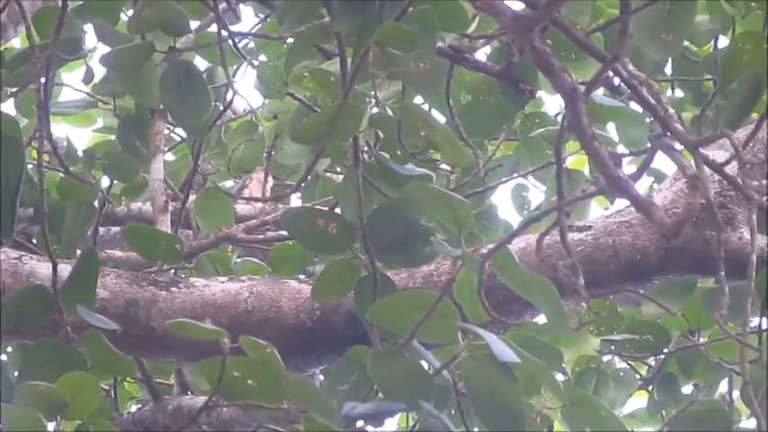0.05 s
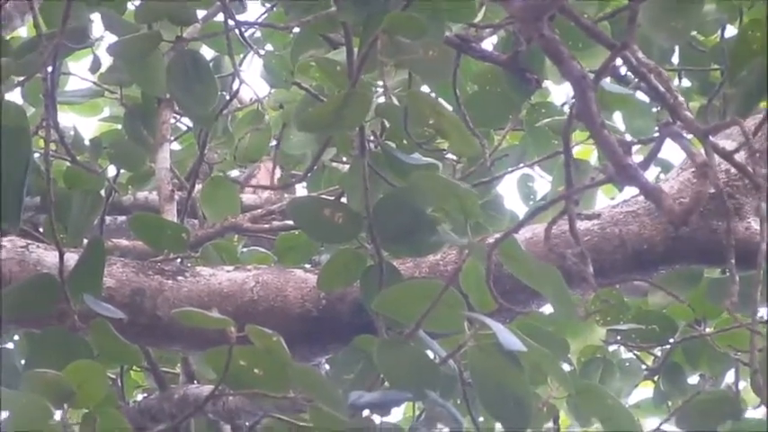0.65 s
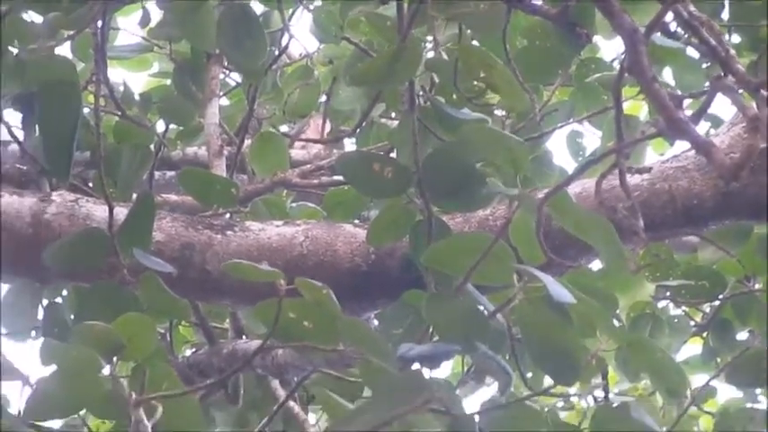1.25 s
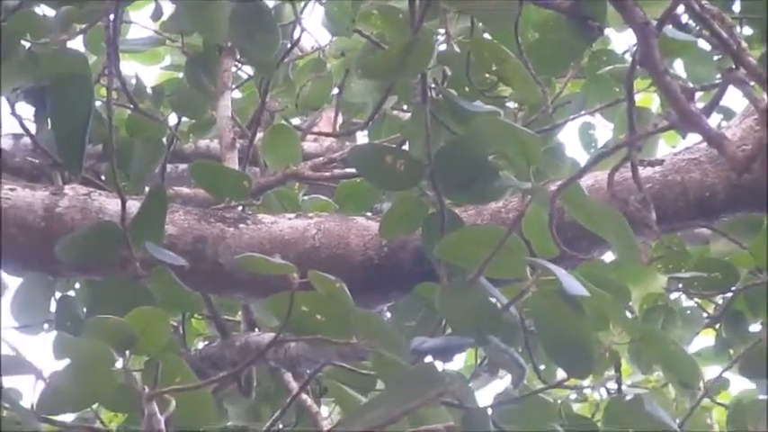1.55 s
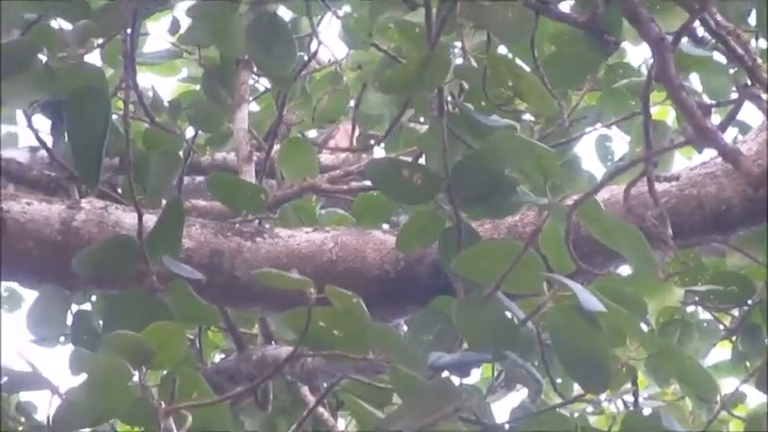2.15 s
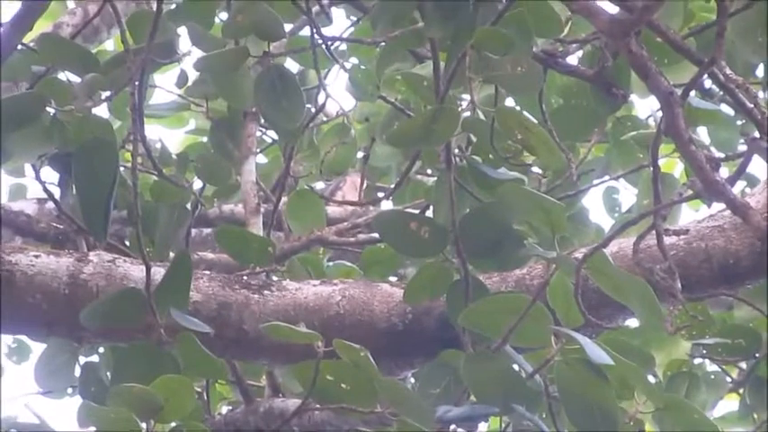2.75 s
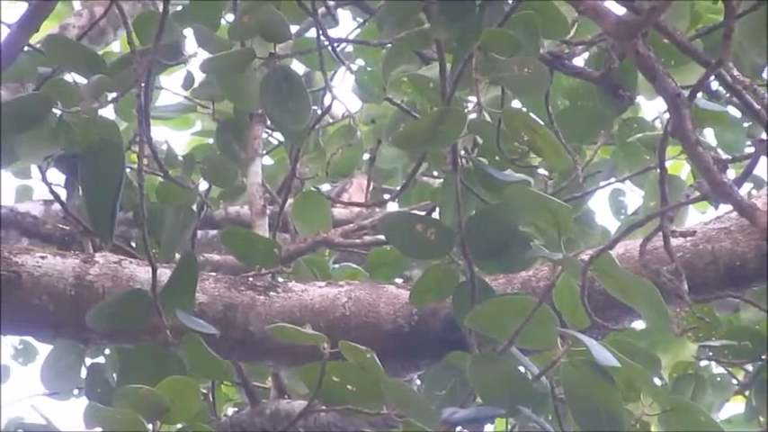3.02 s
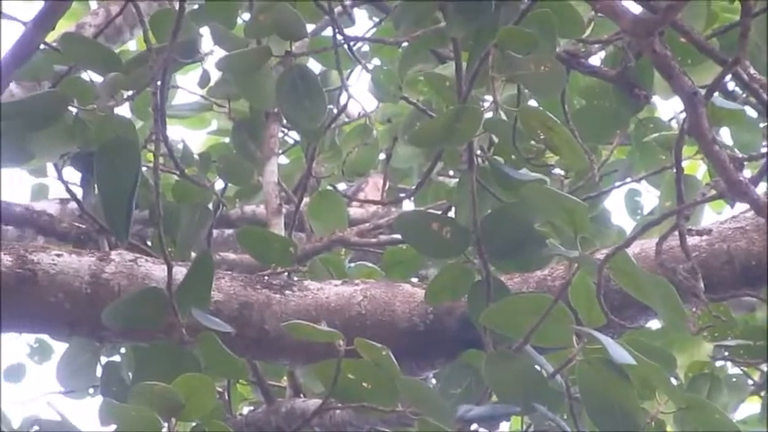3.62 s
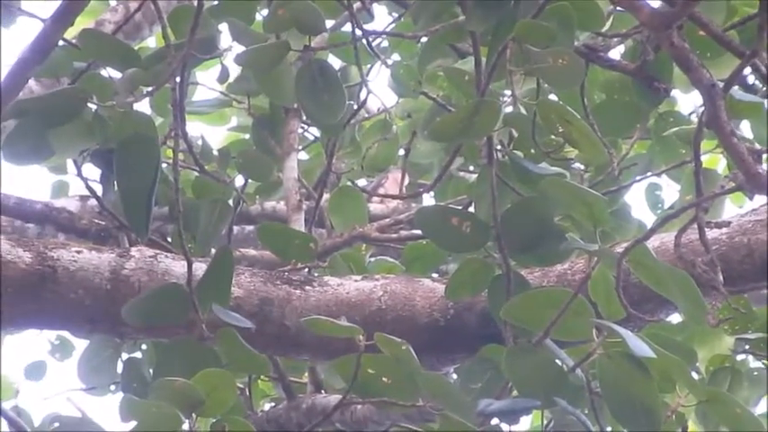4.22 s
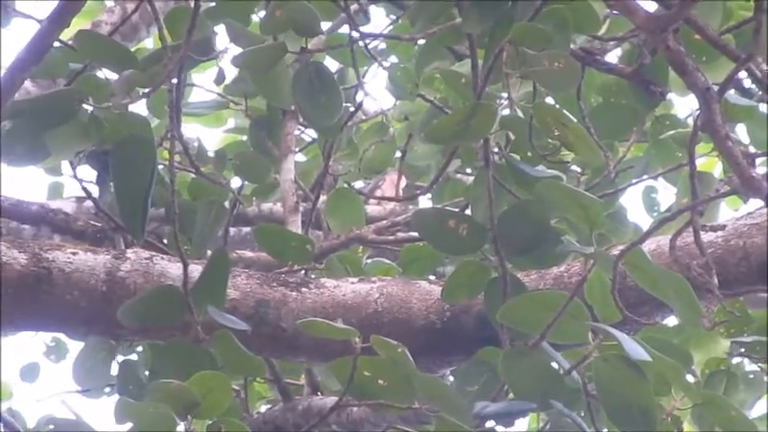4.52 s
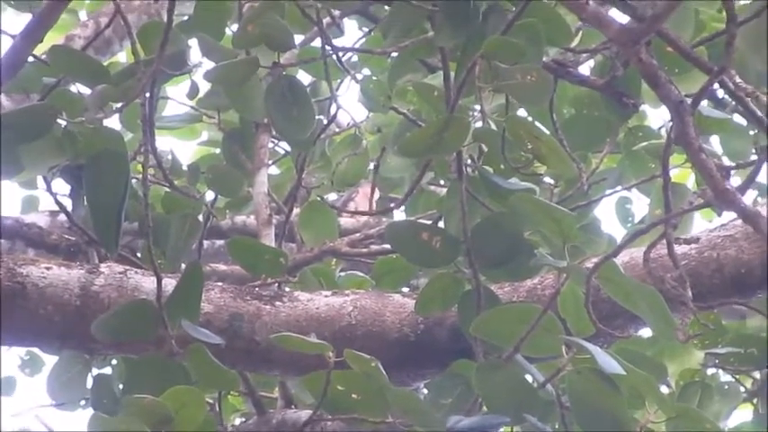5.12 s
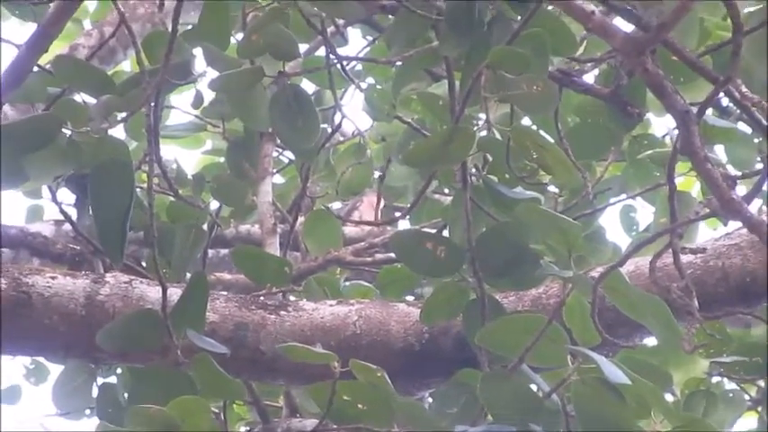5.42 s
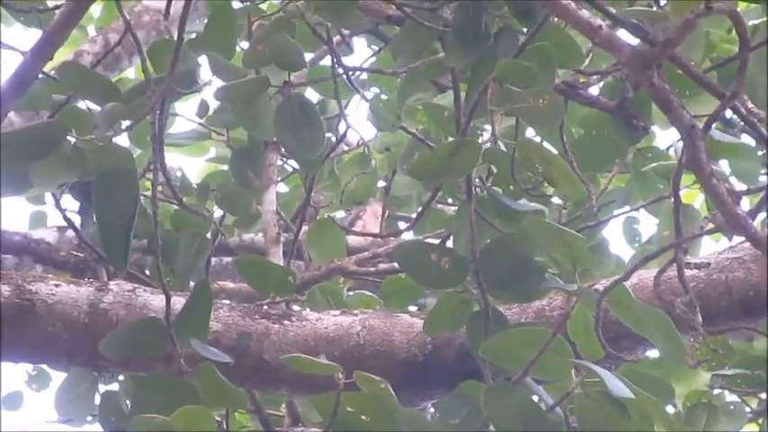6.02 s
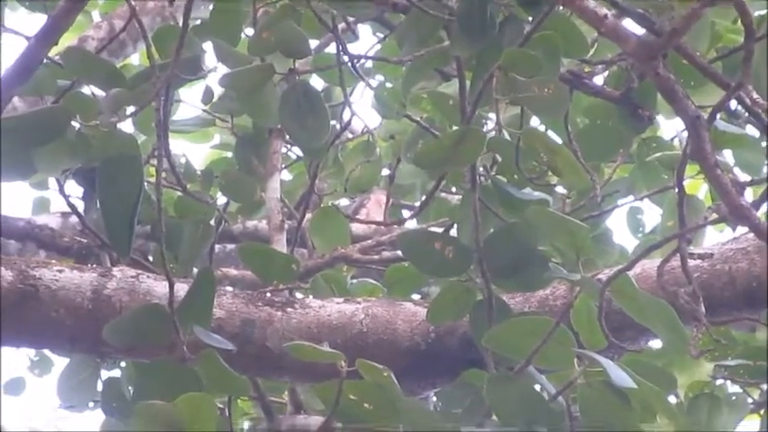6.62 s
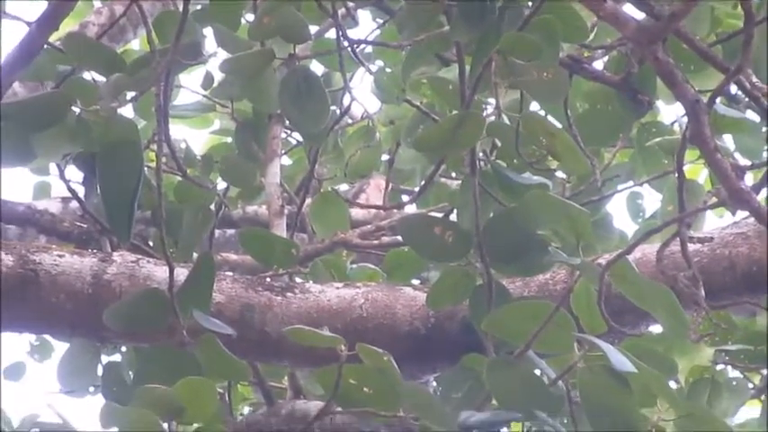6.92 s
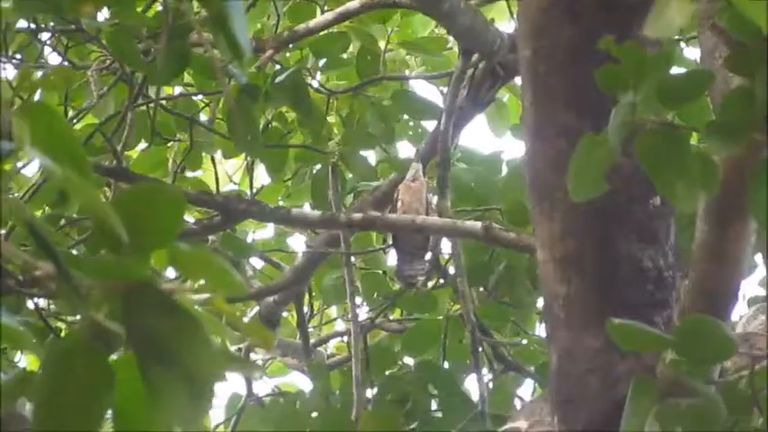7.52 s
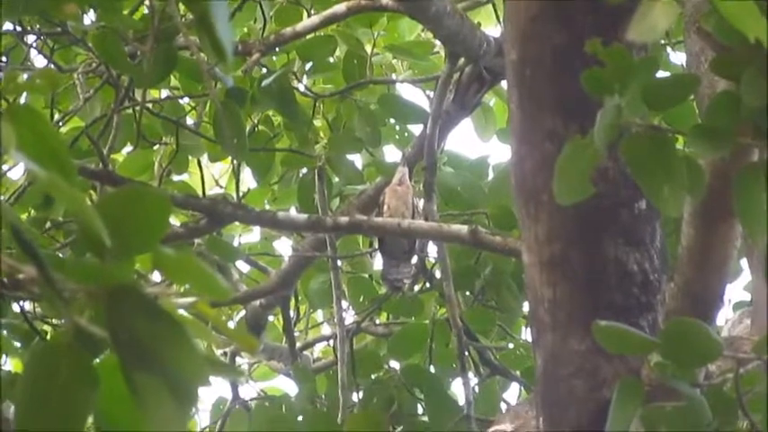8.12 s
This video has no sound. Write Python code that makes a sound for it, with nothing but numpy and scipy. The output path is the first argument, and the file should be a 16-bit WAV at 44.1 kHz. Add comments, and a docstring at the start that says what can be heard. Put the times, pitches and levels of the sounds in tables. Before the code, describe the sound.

A cuckoo whistles three loud echoing notes, small birds chirp over a soft forest hush, and a lower, softer whistled call follows.

```python
"""In a forest, a hawk-cuckoo whistles loud arched notes while small birds drop falling chirps around it.
Trunks and leaves echo every note. Twigs tick and leaves rustle over a soft hush, a far drone and a
faint whirr; everything ducks under the loud call. After a short silent break the hush is thinner
and a lower, softer whistled call follows."""
import sys
import numpy as np
from scipy import signal
from scipy.fft import rfft, irfft
from scipy.io import wavfile
from scipy.ndimage import uniform_filter1d

SR = 44100
rng = np.random.default_rng(int(sys.argv[2]) if len(sys.argv) > 2 else 0)


def inscribe(sig):
    """Save sig as 16-bit PCM at rate SR to the path in sys.argv[1].

    A 1-D sig is mono; a 2-D sig holds one channel per row.
    Samples are clipped to [-1, 1] before scaling.
    """
    pcm = np.round(np.clip(np.atleast_2d(sig).T, -1, 1) * 32767)
    wavfile.write(sys.argv[1], SR, pcm.astype(np.int16))


N = 364266
TIME = np.arange(N) / SR
BREAK_START_S, BREAK_END_S = 6.986, 7.178


def undb(db):
    """Decibels to gain."""
    return 10 ** (np.asarray(db) / 20)


def unit(x):
    """Scale to rms 1."""
    return x / np.sqrt(np.mean(x ** 2))


def pan(db):
    """Stereo gains, left over right by db."""
    return undb([[db / 2], [-db / 2]])


def curves(rows):
    """Interpolate each column over the time in the first."""
    time_s, *columns = np.transpose(rows)
    return [np.interp(TIME, time_s, column) for column in columns]


def wander(rate_hz):
    """Smooth random signal, rms 1."""
    step = max(int(SR / rate_hz), 1)
    held = np.repeat(rng.standard_normal(N // step + 1), step)[:N]
    return unit(uniform_filter1d(held, step))


def band(x, low_hz, high_hz):
    """Band-pass filter."""
    return signal.sosfilt(signal.butter(2, [low_hz, high_hz], "band", fs=SR, output="sos"), x)


def stereo_noise(correlation):
    """White noise, partly shared by both channels."""
    common, side = rng.standard_normal((2, N))
    return unit(np.sqrt(1 + correlation) * common + np.sqrt(1 - correlation) * np.outer([1, -1], side))


def span(start_s, length_s):
    """Sample mask of a note and time since its start."""
    on = (TIME > start_s) & (TIME < start_s + length_s)
    return on, TIME[on] - start_s


def fade(t, length_s, attack_s, release_s):
    """1 at both ends of a note, 0 while held."""
    return np.maximum(1 - t / attack_s, 0) + np.maximum(1 - (length_s - t) / release_s, 0)


def glide(from_hz, to_hz, arch_hz=0):
    """Start, middle and end pitch; the middle lifted by arch_hz."""
    return [from_hz, (from_hz + to_hz) / 2 + arch_hz, to_hz]


def add_note(out, start_s, length_s, pitches_hz, level_db, flutter, peak_at=.5, ease=0):
    """Small bird's note: swells and dies along a three-pitch glide; ease slows the glide's ends."""
    on, t = span(start_s, length_s)
    progress = t / length_s
    eased = progress - ease * np.sin(2 * np.pi * progress) / (2 * np.pi)
    hz = np.polyval(np.polyfit([0, .5, 1], pitches_hz, 2), eased) * flutter[on]
    phase = 2 * np.pi * np.cumsum(hz) / SR
    swell = np.sin(np.pi / 2 * np.interp(progress, [0, peak_at, 1], [0, 1, 0]))
    out[on] += np.sqrt(2) * undb(level_db) * swell * (np.sin(phase) + undb(-47) * np.sin(2 * phase))


# Echoes off near limbs and trunks: delay_s, gain_db
TRUNK_ECHOES = [(.00358, -13), (.00739, -8.5), (.01474, -15), (.04417, -15), (.0785, -15.5),
                (.09365, -19.5)]


def woods(x, wet_db, t60_s, scatter_db, pan_db, lag_samples):
    """Direct sound, twig scatter and trunk echoes, later on the right, plus a diffuse tail."""
    t = TIME[:int(1.5 * SR)]
    scatter = rng.standard_normal(len(t)) * (rng.random(len(t)) < .02)
    scatter *= np.exp(-t / .031) * (t > .006)
    early = undb(scatter_db) * unit(scatter) / np.sqrt(len(t))
    early[0] = 1
    for delay_s, gain_db in TRUNK_ECHOES:
        early[int(round(delay_s * SR))] += undb(gain_db)
    noise = rng.standard_normal((2, len(t)))
    decay = np.exp(-np.log(1000) * t / t60_s)
    treble = 1.53 * band(noise, 3500, 17000) * decay ** 2  # leaves absorb it first
    tail = (band(noise, 200, 4500) * decay + treble) * (1 - np.exp(-t / .024))
    response = np.array([early, np.roll(early, lag_samples)])
    response += undb(wet_db) * unit(tail) * np.sqrt(.22 / len(t))
    return signal.fftconvolve(x[None], response * pan(pan_db), axes=1)[:, :N]


# Drone swell: time_s, gain_db
DRONE_SWELL = [(1.7, -5), (2.2, 10.5), (3.6, 8), (4.3, -5), (6.3, 6.5), (7.2, -7)]


def drone(pitch_hz=88.3, width_hz=8, base_db=-71.5):
    """Far, low, centred drone: a narrow noise band."""
    hum = unit(band(stereo_noise(.85), pitch_hz - width_hz / 2, pitch_hz + width_hz / 2))
    return hum * undb(base_db + curves(DRONE_SWELL)[0])


# Hush spectra before and after the break: frequency_hz, density_db
EARLY_HUSH_SPECTRUM = [(25, -6.5), (60, -10.5), (95, -2.5), (135, -2.5), (190, -11), (330, -9), (650, -13),
                       (1300, -14), (2000, -13), (2700, -14), (4200, -15), (6000, -27.5), (9500, -32.5),
                       (15500, -47.5)]
LATE_HUSH_SPECTRUM = [(15, -42), (25, -10), (156, -22), (260, -17), (895, -25), (1240, -18.5), (1380, -5),
                      (1530, -25.5), (2770, -21), (4620, -36.5), (8350, -39), (13200, -54), (15500, -68)]
# Hush swell: time_s, gain_db
HUSH_SWELL = [(0, 1), (2.0, 4), (3.8, 0), (7.4, -0.55), (7.7, 3.5), (8.26, 5)]


def hush(spectrum, base_db, flicker_db=.9):
    """Distant foliage and rumble: octave bands waver separately; the bass slightly follows the drone."""
    hz, density_db = np.transpose(spectrum)
    octave = np.log2(np.maximum(np.fft.rfftfreq(N, 1 / SR), 1))
    colour = undb(np.interp(octave, np.log2(hz), density_db))
    stereo_width = np.interp(octave, np.log2([100, 5000]), [.3, .8])
    mid, side = rfft(rng.standard_normal((2, N))) * colour
    stereo = mid + stereo_width * np.outer([1, -1], side)
    bass_db = -2.5 + .1 * curves(DRONE_SWELL)[0]
    out = 0
    for centre in range(5, 15):
        octave_band = irfft(stereo * np.maximum(1 - abs(octave - centre), 0), N)
        out += octave_band * undb(flicker_db * wander(9) + bass_db * (2 ** centre < 200))
    return unit(out) * undb(base_db + curves(HUSH_SWELL)[0]) * pan(1.85)


# Whirr resonances: centre_hz, gain_db
WHIRR_RESONANCES = [(740, -4.5), (860, -11.5), (1010, -0.5), (1135, -3.5)]
# Whirr envelope: time_s, level_db
WHIRR_ENVELOPE = [(0, -60), (.7, -53.5), (1.0, -88), (7.45, -71), (7.6, -59), (8.26, -58)]


def whirr(width_hz=24):
    """Faint whirr at the start and end: noise through narrow resonances."""
    noise = stereo_noise(.46)
    ring = sum(undb(db) * band(noise, hz - width_hz / 2, hz + width_hz / 2)
               for hz, db in WHIRR_RESONANCES)
    return unit(ring) * undb(curves(WHIRR_ENVELOPE)[0])


# Chatter envelope: time_s, level_db
CHATTER_ENVELOPE = [(0, -46.5), (.4, -56), (1.7, -49.5), (2.9, -68), (3.9, -52), (5.5, -50), (6.7, -75.5),
                    (8.0, -55)]


def far_chatter(count=320, centre_hz=3500):
    """Many short, far slurs, blurred to a wash by the trees."""
    out, flutter = np.zeros(N), 1 + .02 * wander(400)
    for k, (offset, length, pitch, fall) in enumerate(rng.random((count, 4))):
        start_s = (k + offset) / count * TIME[-1] - .05
        hz = centre_hz * 2 ** (.7 * (pitch - .5))
        pitches_hz = hz * (1 + .18 * fall * np.array([1, 0, -1]))
        add_note(out, start_s, .063 + .11 * length, pitches_hz, 0, flutter)
    wash = woods(out, wet_db=1.5, t60_s=1, scatter_db=-3, pan_db=2.5, lag_samples=3)
    return unit(wash) * undb(curves(CHATTER_ENVELOPE)[0])


# Falling chirps: start_s, length_s, start_hz, level_db
FALLING_CHIRPS = [(0.061, .17, 4724, -48), (.96, .18, 4700, -44), (1.38, .16, 4890, -40.5),
                  (1.722, 0.086, 4740, -31.5), (2.393, 0.1, 4540, -47), (2.682, 0.1, 4830, -51),
                  (2.977, 0.17, 4350, -52), (3.172, 0.12, 4760, -40.5), (3.385, 0.11, 4300, -57),
                  (3.452, 0.19, 5440, -50), (3.644, .092, 4835, -36.5), (3.904, 0.13, 4450, -52),
                  (4.172, 0.11, 4900, -51.5), (4.565, .14, 4840, -39.5), (4.741, 0.17, 4980, -46.5),
                  (5.123, 0.088, 4700, -36), (5.448, .13, 4180, -48), (5.727, 0.091, 4810, -36.5),
                  (6.105, .14, 4620, -47.5), (6.575, 0.12, 4940, -42.5), (6.748, 0.18, 4850, -45.5),
                  (6.882, 0.067, 4300, -34), (7.517, 0.19, 5780, -50.5), (7.878, 0.11, 5840, -42.5)]


def chirpers(end_hz=2694, beak_hz=3200, beak_width_hz=850, bypass=.14):
    """Two-voiced chirps slide down and bloom as they pass the beak resonance."""
    out, flutter = np.zeros(N), 1 + .02 * wander(600)
    for start_s, length_s, start_hz, level_db in FALLING_CHIRPS:
        arch_hz = 3000 * (length_s - .125)  # long chirps arch, short ones sag
        pitches_hz = glide(start_hz, end_hz, arch_hz)
        add_note(out, start_s, length_s, pitches_hz, level_db, flutter, peak_at=.7, ease=.3)
        join_s = .31 * length_s  # weaker upper voice
        add_note(out, start_s + join_s, length_s - join_s, glide(5360, 4340), level_db - 13.5, flutter)
    ring = signal.lfilter(*signal.iirpeak(beak_hz, beak_hz / beak_width_hz, fs=SR), out)
    return bypass * out + (1 - bypass) * ring


# Downward flicks: start_s, level_db
TINY_FLICKS = [(.273, -60), (.377, -62), (2.6, -58), (2.785, -63), (3.839, -60), (3.917, -55.5),
               (4.015, -63), (4.27, -63), (4.396, -63), (6.754, -57.5)]
# Longer, fainter slurs: start_s, length_s, start_hz
TINY_SLURS = [(1.87, .062, 9200), (2.344, 0.079, 8500), (2.687, 0.066, 8800), (3.087, 0.1, 8300),
              (5.98, 0.18, 9800), (6.774, 0.074, 9150)]


def tiny_bird(flick_s=.016, flick_hz=(7550, 7000, 6060), slur_end_hz=8200, slur_db=-70):
    """Quick, clean, very high notes from close by."""
    out, flutter = np.zeros(N), 1 + .0049 * wander(320)
    for start_s, level_db in TINY_FLICKS:
        add_note(out, start_s, flick_s, flick_hz, level_db, flutter)
    for start_s, length_s, start_hz in TINY_SLURS:
        add_note(out, start_s, length_s, glide(start_hz, slur_end_hz, arch_hz=249), slur_db, flutter)
    return woods(out, wet_db=0, t60_s=.54, scatter_db=-17, pan_db=-4, lag_samples=1)


def cuckoo_voice(notes, overtones_db, waver, rasp_db, throat_hz, throat_width_hz):
    """Trembling whistle and its overtones, which ring out when the pitch nears throat_hz."""
    whistle, overtones = np.zeros((2, N))
    tremble = 1 + waver * wander(180)
    rasp = 1 + undb(rasp_db) * unit(band(rng.standard_normal(N), 350, 2000))
    for on, *contours in notes:
        hz, level_db = (uniform_filter1d(contour, SR // 160) for contour in contours)
        phase = 2 * np.pi * np.cumsum(hz * tremble[on]) / SR
        envelope = np.sqrt(2) * undb(level_db) * rasp[on] * signal.windows.tukey(len(phase), .05)
        resonance = np.exp(-((hz - throat_hz) / throat_width_hz) ** 2)
        harmonics = sum(undb(db) * np.sin(k * phase) for k, db in enumerate(overtones_db, 2))
        whistle[on] += envelope * np.sin(phase)
        overtones[on] += envelope * resonance * harmonics
    return whistle, overtones


def loud_note(start_s, length_s, crest_hz, shoulder_hz, end_hz, level_db, release_s, dip_at_s):
    """Pitch sweeps to the crest, sags to the shoulder, then drops; the level dips briefly."""
    launch_hz, rise_hz_per_s, settle_s, drop_s = 1496, 18500, .05, .053
    on, t = span(start_s, length_s)
    rise_s = (crest_hz - launch_hz) / rise_hz_per_s
    hz = launch_hz + (crest_hz - launch_hz) * np.sin(np.pi / 2 * np.minimum(t / rise_s, 1))
    hz += (shoulder_hz - crest_hz) * (1 - np.exp(-np.maximum(t - rise_s, 0) / settle_s))
    hz += (end_hz - hz) * np.maximum(1 - (length_s - t) / drop_s, 0)
    fade_db = -23.5 * fade(t, length_s, attack_s=.035, release_s=release_s)
    dip_db = -9 * np.exp(-((TIME[on] - dip_at_s) / .007) ** 2)
    return on, hz, level_db + fade_db + dip_db


# Loud call: start_s, length_s, crest_hz, shoulder_hz, end_hz, level_db, release_s, dip_at_s
LOUD_CALL = [(0.442, .205, 2160, 2162, 1594, -14, 0.015, .513),
             (0.81, .232, 2332, 2135, 1300, -12.5, .026, .899),
             (1.046, .116, 1964, 1847, 1543, -15.5, 0.032, 1.108)]
# Harmonics from the second up: gain_db
LOUD_HARMONICS_DB = [-29.5, -30.5, -40, -40.5, -53.5, -54.5]


def loud_cuckoo(sizzle_db=-47, drop_band_hz=(1500, 1950)):
    """Arched whistles with more scattered overtones; a faint high sizzle follows each note's drop."""
    notes = [loud_note(*row) for row in LOUD_CALL]
    whistle, overtones = cuckoo_voice(notes, LOUD_HARMONICS_DB, waver=.0047, rasp_db=-36.5,
                                      throat_hz=2320, throat_width_hz=314)
    body = woods(whistle, wet_db=-4.5, t60_s=.89, scatter_db=-4, pan_db=3, lag_samples=2)
    edge = woods(overtones, wet_db=8, t60_s=.81, scatter_db=-2, pan_db=0, lag_samples=1)
    drop = band(band(body[0], *drop_band_hz), *drop_band_hz)
    envelope = np.abs(uniform_filter1d(np.abs(drop), SR // 25)) ** .72
    sizzle = envelope * unit(band(stereo_noise(.28), 12000, 13700))
    return body + edge + undb(sizzle_db) * sizzle


# Twig ticks: start_s, knock_db, crack_db, decay_s
TWIG_TICKS = [(1.576, -36.5, -50, .011), (3.556, -72, -44, 0.015), (3.712, -48.5, -53, 0.012),
              (4.607, -45, -44, 0.012), (5.663, -41.5, -47, 0.0094), (6.281, -47, -61, .012),
              (6.611, -50.5, -73, 0.1), (6.907, -38, -25, 0.0036)]
# Knock, crack and snap bands: low_hz, high_hz
TWIG_BANDS = [(210, 1350), (1400, 2800), (4500, 7700)]


def twigs(snap_re_crack_db=-27):
    """Dry ticks: low knock, mid crack and high snap decay together."""
    out = 0
    for k, edges_hz in enumerate(TWIG_BANDS):
        envelope = np.zeros(N)
        for start_s, knock_db, crack_db, decay_s in TWIG_TICKS:
            levels_db = knock_db, crack_db, crack_db + snap_re_crack_db
            on = (TIME >= start_s) & (TIME < start_s + .2)
            envelope[on] += undb(levels_db[k]) * np.exp(-(TIME[on] - start_s) / decay_s)
        out += envelope * unit(band(stereo_noise(.63), *edges_hz))
    return out


# Leaf rustles: centre_s, width_s, level_db
LEAF_RUSTLES = [(1.58, 0.027, -58), (2.28, 0.13, -69), (2.581, 0.048, -61), (3.3, .04, -69.5),
                (3.621, 0.08, -69), (3.84, 0.06, -64), (5.7, 0.086, -65.5), (6.43, .18, -70),
                (6.9, .07, -70)]


def leaves(grain_db=3):
    """Short swells of bright, grainy noise."""
    envelope = sum(undb(level_db) * np.exp(-((TIME - centre_s) / width_s) ** 2)
                   for centre_s, width_s, level_db in LEAF_RUSTLES)
    grain = undb(grain_db * wander(340))
    return envelope * unit(grain * band(stereo_noise(.1), 3300, 13600))


# Far whistles: start_s, length_s, pitch_hz, fall_hz, level_db
THIN_WHISTLES = [(1.815, 0.1, 4400, 794, -51), (2.092, 0.18, 4700, 498, -57.5),
                 (2.24, 0.13, 815, 65, -59.5), (2.911, 0.1, 4800, 850, -58), (2.92, .13, 3990, 200, -56),
                 (3.388, 0.14, 5230, 1197, -57.5), (3.42, 0.2, 4330, 400, -50), (3.59, 0.36, 4164, 81, -52),
                 (4.82, 0.34, 3520, 124, -52.5), (4.846, 0.22, 2857, 116, -53.5),
                 (5.215, 0.2, 4160, 540, -47.5), (5.291, .2, 3330, 375, -52.5),
                 (5.341, 0.35, 4010, -170, -51), (5.925, 0.26, 4670, 749, -61),
                 (6.267, 0.061, 880, 143, -60), (6.365, 0.03, 730, 34, -57), (6.42, 0.166, 3770, 347, -60),
                 (6.58, 0.14, 2105, 148, -61), (6.66, 0.13, 4750, 503, -56)]


def thin_whistlers(bow=.017, straight_s=.19):
    """Far birds' thin glides: shorter than straight_s they arch, longer they sag."""
    out, flutter = np.zeros(N), 1 + .013 * wander(500)
    for start_s, length_s, pitch_hz, fall_hz, level_db in THIN_WHISTLES:
        arch_hz = bow * pitch_hz * np.tanh((straight_s - length_s) / .0617)
        pitches_hz = glide(pitch_hz + fall_hz / 2, pitch_hz - fall_hz / 2, arch_hz)
        add_note(out, start_s, length_s, pitches_hz, level_db, flutter)
    return out


# Wheeze contour: time_s, pitch_hz, level_db
WHEEZE_CONTOUR = [(5.56, 7240, -63), (5.62, 7100, -57), (5.73, 7000, -57), (5.84, 6230, -72)]


def wheeze():
    """One high bird note whose pitch shakes fast."""
    hz, level_db = curves(WHEEZE_CONTOUR)
    phase = 2 * np.pi * np.cumsum(hz * (1 + .0276 * wander(900))) / SR
    on = (TIME > WHEEZE_CONTOUR[0][0]) & (TIME < WHEEZE_CONTOUR[-1][0])
    return np.sin(phase) * undb(level_db) * on


def soft_note(start_s, length_s, pitch_hz, arch_hz, step_hz, level_db, tilt_db):
    """A shallow arch, or a slide to a lower pitch just past the middle."""
    on, t = span(start_s, length_s)
    progress = t / length_s
    step = (1 + np.tanh((t - .57 * length_s) / .018)) / 2
    hz = pitch_hz - arch_hz * (2 * progress - 1) ** 2 - step_hz * step
    fade_db = -17 * fade(t, length_s, attack_s=.025, release_s=.012)
    return on, hz, level_db + tilt_db * (progress - .5) + fade_db


# Soft call: start_s, length_s, pitch_hz, arch_hz, step_hz, level_db, tilt_db
SOFT_CALL = [(7.153, 0.062, 1398, -1, 1, -50.5, -3), (7.253, 0.19, 1350, -40, 84, -44, -3),
             (7.554, 0.11, 1446, 103, -8, -35.5, 0), (7.747, .197, 1422, -22.5, 106.5, -38.5, -1.5),
             (8.049, 0.12, 1492, 100.5, -1, -31, -1.5)]
# Harmonics from the second up: gain_db
SOFT_HARMONICS_DB = [-26, -42, -53, -37, -31.5, -34.5, -39, -35, -39]


def soft_cuckoo():
    """Lower, steadier whistle; nearly dry overtones give a glassy edge."""
    notes = [soft_note(*row) for row in SOFT_CALL]
    whistle, overtones = cuckoo_voice(notes, SOFT_HARMONICS_DB, waver=.0012, rasp_db=-45,
                                      throat_hz=1295, throat_width_hz=260)
    edge = woods(overtones, wet_db=-19, t60_s=.53, scatter_db=-17, pan_db=1, lag_samples=1)
    body = woods(whistle, wet_db=-2, t60_s=.66, scatter_db=-4, pan_db=1.5, lag_samples=1)
    return body + edge


def scene():
    """Birds near and far among the trees, mostly left, over the forest background."""
    near = woods(chirpers(), wet_db=-1, t60_s=.4, scatter_db=-1, pan_db=9.5, lag_samples=3)
    far = woods(thin_whistlers() + wheeze(), wet_db=5, t60_s=.7, scatter_db=-1.5,
                pan_db=4.5, lag_samples=3)
    early_hush = hush(EARLY_HUSH_SPECTRUM, base_db=-53)
    late_hush = hush(LATE_HUSH_SPECTRUM, base_db=-55)
    background = np.where(TIME < BREAK_END_S, early_hush, late_hush)
    birds = loud_cuckoo() + soft_cuckoo() + undb(-.5) * near + far + tiny_bird() + far_chatter()
    return birds + twigs() + leaves() + drone() + whirr() + background


def gain_control(x, threshold_db=-15, release_s=1.58):
    """2:1 compressor: gain drops at once on loud peaks and creeps back."""
    release = np.exp(-TIME / release_s)
    held_peak = np.maximum.accumulate(np.abs(x).max(axis=0) / release) * release
    gain = np.maximum(held_peak / undb(threshold_db), 1) ** -.5
    return x * uniform_filter1d(gain, SR // 200)


def record(dry):
    """Gain control, the silent break and a steep top cut."""
    audible = (TIME < BREAK_START_S) | (TIME > BREAK_END_S)
    lowpass = signal.ellip(10, .2, 80, 15500, fs=SR, output="sos")
    return signal.sosfilt(lowpass, gain_control(dry) * audible)


dry = scene()
out = record(dry)
inscribe(out)
```